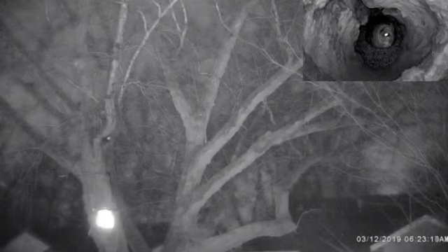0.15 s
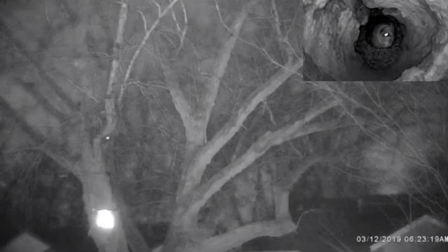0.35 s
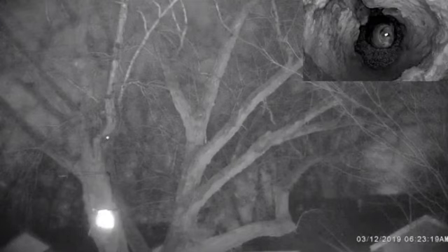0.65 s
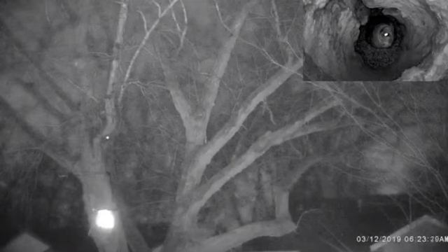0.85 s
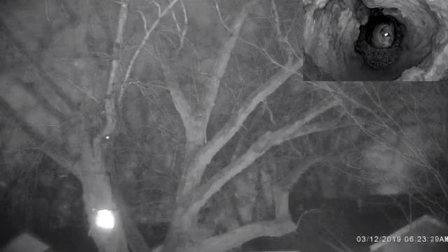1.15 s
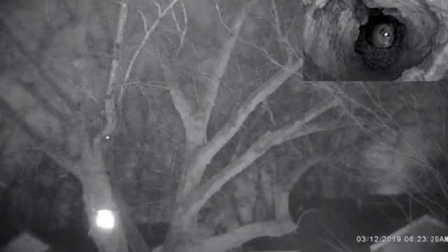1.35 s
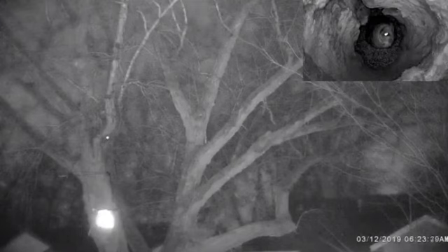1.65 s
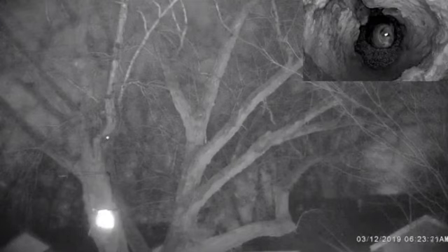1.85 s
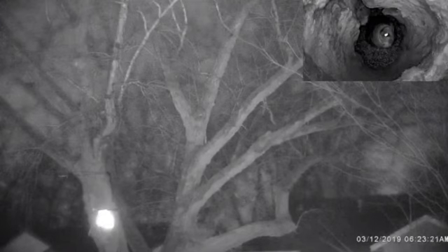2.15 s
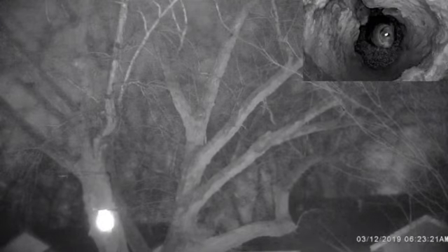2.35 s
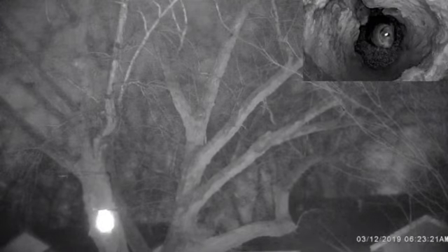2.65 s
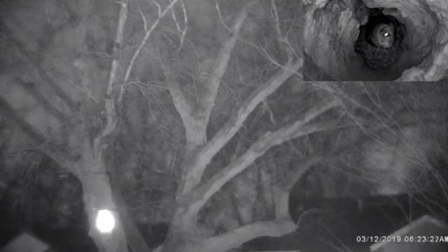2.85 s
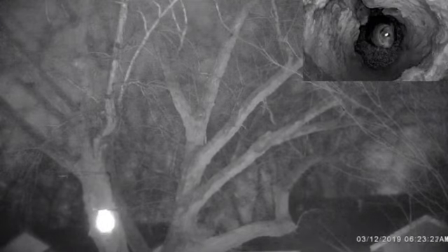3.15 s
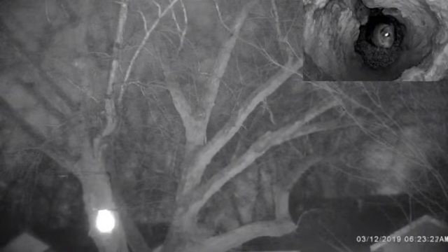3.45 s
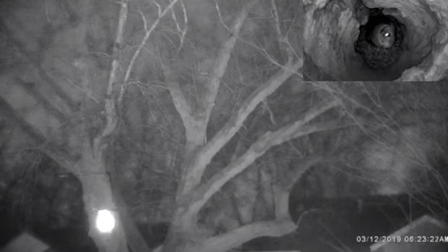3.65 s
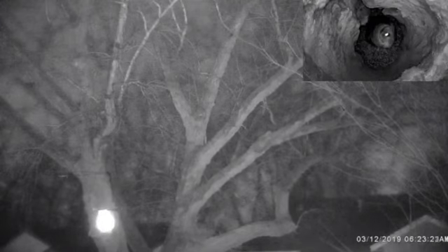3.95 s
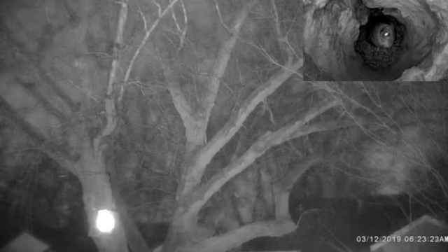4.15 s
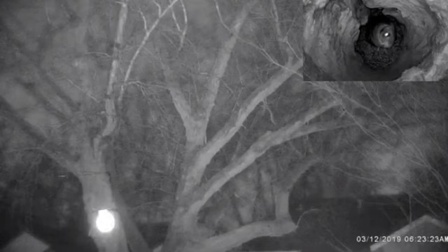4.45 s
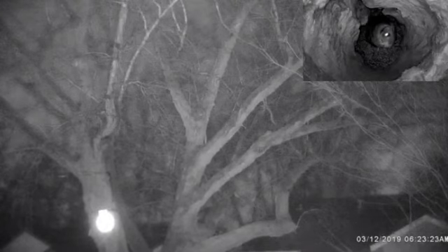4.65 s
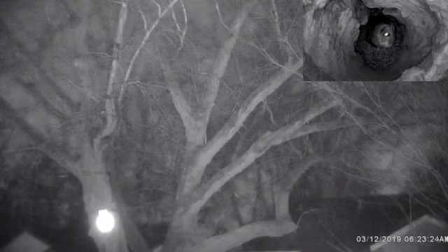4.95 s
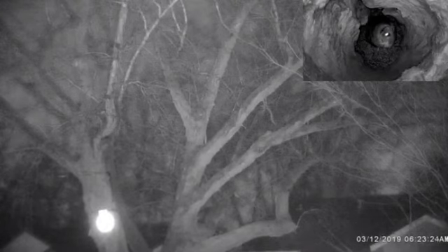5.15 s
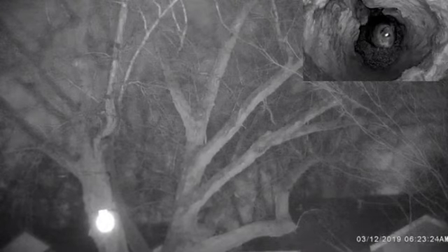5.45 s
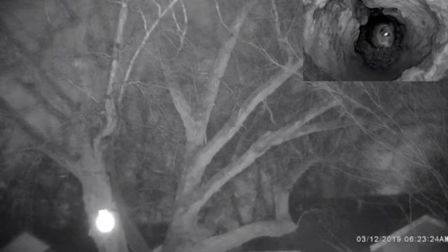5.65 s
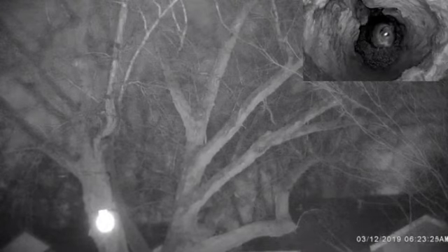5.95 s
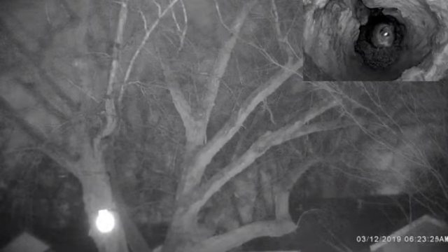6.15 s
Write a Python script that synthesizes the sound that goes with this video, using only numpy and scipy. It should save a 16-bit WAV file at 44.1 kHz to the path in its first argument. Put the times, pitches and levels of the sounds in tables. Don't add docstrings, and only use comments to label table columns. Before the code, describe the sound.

Wooden bumps and scratching, a thin wheezy squeal from a second bird, then a fast run of owl hoots ending in one long, shaky call.

```python
import sys
import numpy as np
from scipy import signal
from scipy.fft import rfft, irfft
from scipy.io import wavfile
from scipy.ndimage import uniform_filter1d

SR = 44100
rng = np.random.default_rng(int(sys.argv[2]) if len(sys.argv) > 2 else 0)


def elevation(decibels):
    levels = np.asarray(decibels, float)
    return 10 ** (levels / 20)


def persist_wave(psi):
    counts = np.round(np.clip(psi, -1, 1) * 32767).astype(np.int16)
    wavfile.write(sys.argv[1], SR, np.atleast_2d(counts).T)


N = 277830

CUTOFF_HZ = 7950
RASP_DB, BEAK_DB = -35.5, -7.5
# (start [s], length [s], top pitch [Hz], level [dB], lateness of the climb [exponent])
HOOTS = [(1.339, .07, 260.5, -28, 1.2), (1.67, .073, 206.1, -22, 0.86), (1.987, 0.081, 311, -20.5, 1.36),
         (2.293, 0.093, 287.1, -20, 1.21), (2.606, 0.1, 339.4, -22.5, 1.13), (2.914, 0.11, 413, -22, 1.2),
         (3.22, .11, 418.3, -20, 1.2), (3.528, 0.11, 417.7, -20, 1.07), (3.84, .113, 342.2, -20.5, .7),
         (4.154, 0.13, 400.4, -20, .85), (4.456, 0.12, 410, -19.5, 1.04), (4.771, 0.13, 421.8, -20, 1.02),
         (5.103, 0.14, 410, -22, 0.87)]


def at_hz(points, hz):
    points_hz, db = np.transpose(points)
    return np.interp(np.log(hz + 1), np.log(points_hz), db)


def in_time(rows, t):
    s, *columns = np.transpose(rows)
    return [np.interp(t, s, c) for c in columns]


def humps(rows, t):
    total = sum(elevation(db) * np.exp(-((t - s) / half) ** 2) for s, half, db in rows)
    return 20 * np.log10(total + 1e-7)


def rms_one(x):
    return x / np.sqrt(np.mean(x ** 2) + 1e-20)


def drift(rate, count):
    r = np.exp(-2 * np.pi * rate / SR)
    settle = 4000
    slow = signal.lfilter([1], [1, -2 * r, r * r], rng.standard_normal(count + settle))
    return rms_one(slow[settle:])


def coloured(spectrum):
    hz = np.arange(N // 2 + 1) * SR / N
    return rms_one(irfft(rfft(rng.standard_normal(N)) * elevation(at_hz(spectrum, hz)), N))


def band_pass(x, order, low_hz, high_hz):
    return signal.sosfilt(signal.butter(order, [low_hz, high_hz], "band", fs=SR, output="sos"), x)


def band(low_hz, high_hz):
    return rms_one(band_pass(rng.standard_normal(N), 3, low_hz, high_hz))


def resonance(hz, centre_hz, width_hz):
    return 1 / (1 - (hz / centre_hz) ** 2 + 1j * hz * width_hz / centre_hz ** 2)


def night(t):
    # (frequency [Hz], level [dB per Hz])
    floor_curve = [(15, -50), (25, -21), (32, -9), (44, -11), (65, -6), (124, -18.5), (186, -17.5),
                   (418, -35), (815, -30), (1350, -39.5), (1970, -43), (2750, -55.5), (7500, -78.5),
                   (9750, -91), (16500, -120)]
    # (frequency [Hz], rms level [dB])
    hum_lines = [(60, -68.5), (1935, -91.5)]
    hum = 0
    for hz, db in hum_lines:
        hum = hum + elevation(db + 0.85 * drift(5.3, N)) * np.sqrt(2) * np.sin(2 * np.pi * hz * t)
    return elevation(-60.5 + 0.4 * drift(15, N)) * coloured(floor_curve) + hum


def shuffle(t):
    # (time [s], half length [s], upper rumble [dB], deep rumble [dB])
    moves = [(.01, 0.051, -48.5, -45.5), (0.169, .02, -23.5, -35), (0.344, .025, -26.5, -30.5),
             (0.423, 0.054, -48.5, -37), (0.519, 0.028, -23, -29), (0.584, 0.035, -29, -33.5),
             (0.742, 0.023, -30, -49), (0.856, 0.048, -43.5, -34.5), (0.958, 0.045, -26, -36),
             (1.068, 0.064, -52.5, -46), (1.311, 0.026, -44, -53), (1.457, 0.028, -44.5, -58),
             (1.614, .06, -53.5, -57.5), (1.766, 0.046, -55, -40), (1.838, .012, -30.5, -36.5),
             (2.008, 0.042, -32.5, -34.5), (2.226, 0.026, -52, -50), (2.595, 0.031, -53.5, -60.5),
             (2.768, .03, -37, -35), (2.846, 0.023, -22, -41), (2.942, 0.074, -35.5, -35),
             (3.095, 0.09, -40.5, -37), (3.242, 0.036, -29, -35), (3.318, 0.06, -28, -39.5),
             (3.456, 0.028, -38.5, -46), (3.574, 0.033, -28.5, -37), (3.653, 0.036, -31.5, -45.5),
             (3.844, 0.018, -29, -31.5), (3.933, .025, -34.5, -34), (4.1, 0.097, -58, -56.5)]
    # (frequency [Hz], level [dB per Hz])
    edge_curve = [(82, -33.5), (140, 2.5), (345, -15.5), (652, -35.5), (742, -39.5), (835, -39.5),
                  (1500, -48), (1950, -90), (3300, -120)]
    deep_lag_s, deep_stretch = 0.023, 1.21
    still_s = 4.05
    restless = np.clip((still_s - t) / 0.071 + 1, 0, 1)

    deep_moves = [(s + deep_lag_s, half * deep_stretch, db) for s, half, _, db in moves]
    deep = elevation(humps(deep_moves, t)) + restless * elevation(-54.5 + 1.0 * drift(1.4, N))
    deep = deep * band(36, 70) * elevation(1.7 * drift(7.3, N))

    upper_db = np.maximum(humps([row[:3] for row in moves], t), -60.5 - 30 * (1 - restless))
    lumps = elevation(3.5 * drift(35, N))
    upper = elevation(upper_db - 3) * band(70, 140) * lumps
    edge = elevation(1.116 * (upper_db + 36.5) - 43.0) * coloured(edge_curve) * lumps

    rustle = elevation(-70.5) * band(1200, 6300) * np.exp(-((t - .535) / 0.081) ** 2)
    return deep + upper + edge + rustle


def bumps():
    # (time [s], peak level [dB], ring pitch [Hz])
    knocks = [(0.139, -15.5, 67.3), (0.169, -9, 61.9), (0.324, -27, 125), (0.343, -5.5, 139),
              (0.503, -15, 63), (0.523, -2, 93.6), (0.585, -5.5, 122), (0.722, -17, 163), (0.912, -7, 125),
              (0.97, -6.5, 67.3), (1.833, -10, 67.5), (1.959, -35, 64.6), (2.754, -11, 72.7),
              (2.802, -7, 64.6), (2.841, -8.5, 60.3), (3.045, -13.5, 96.9), (3.115, -14, 59.9),
              (3.378, -11, 70.6), (3.443, -23, 59.6), (3.818, -28, 76), (3.918, -11, 105)]
    out, t = np.zeros(N), np.arange(int(.06 * SR)) / SR
    for s, peak_db, hz in knocks:
        soft_start = 1 - np.exp(-(t / 0.0015) ** 2)
        push = np.sin(2 * np.pi * hz * t) * elevation(-60 * t * hz / 4.9) * soft_start
        at = int(s * SR)
        out[at:at + len(t)] -= elevation(peak_db - 6.5) * push
    return out


def ticks():
    # (time [s], peak level [dB], centre [Hz], ticks in the run [count])
    scratches = [(.137, -51, 4060, 1), (.161, -47, 4000, 1), (.173, -38.5, 3880, 1), (.34, -54.5, 2940, 2),
                 (0.351, -46, 1560, 1), (.463, -45, 3850, 1), (.501, -35.5, 2340, 5),
                 (0.509, -35.5, 3730, 4), (.582, -44, 4800, 3), (.885, -34.5, 3400, 1),
                 (0.884, -39, 2330, 1), (.975, -33, 3690, 1), (0.975, -36, 2314, 1), (1.03, -43.5, 1140, 1),
                 (1.837, -32, 378, 1), (1.948, -32.5, 2920, 1), (1.967, -38, 3260, 1),
                 (1.981, -37, 2600, 1), (2.019, -35, 3470, 1), (2.758, -30, 381, 1), (2.806, -40, 4140, 1),
                 (2.852, -26.5, 453, 1), (2.854, -44, 1200, 1), (2.856, -53.5, 3200, 1),
                 (3.266, -48, 5790, 2)]
    gap_s, loss_db = .009, 2.5
    out, t = np.zeros(N), np.arange(int(0.027 * SR)) / SR
    whites = rng.standard_normal((len(scratches), 5, len(t)))
    for (s, peak_db, hz, count), white in zip(scratches, whites):
        for k in range(round(count)):
            burst = white[k] * (t / .002) * np.exp(1 - t / 0.0017)
            burst = band_pass(burst, 3, hz * .82, min(hz * 1.11, 7800))
            at = int((s + k * gap_s - .002) * SR)
            level = elevation(peak_db - k * loss_db - 5.0)
            out[at:at + len(t)] += level * burst / np.abs(burst).max()
    return out


def wheezy_air():
    # (frequency [Hz], level [dB per Hz])
    air_curve = [(1500, -35.5), (2000, -20), (3000, -4.5), (4500, -9.5), (6500, -3), (7500, -4),
                 (7900, -14.5), (9000, -60)]
    # (centre [Hz], width [Hz], level [dB])
    peaks = [(2200, 350, -7), (3160, 62, 2.5), (3630, 52, 0.5), (5090, 28, -6), (5810, 27, -6.5),
             (6140, 160, -9.5), (6860, 83, 2.5), (7100, 32, -6.5)]
    hz = np.arange(N // 2 + 1) * SR / N
    whistles = .35 + sum(elevation(db) * np.abs(hz * w / c ** 2 * resonance(hz, c, w)) for c, w, db in peaks)
    air = rms_one(irfft(rfft(coloured(air_curve)) * whistles, N))
    return air + elevation(-6.5) * band(480, 860)


def squeal(t):
    # (time [s], pitch [Hz], level [dB])
    course = [
        (.66, 746, -79.5),
        (.7, 716, -59),
        (.78, 725.4, -55.5),
        (1.05, 727, -49.5),
        (1.215, 777, -51.5),
        (1.24, 854, -46),
        (1.31, 863, -44),
        (1.39, 780, -52),
        (1.44, 702, -46),
    ]
    # (multiple of the pitch, level [dB])
    partials = [(1, 1), (2, -12), (3, -19), (4, -20.5), (5, -15.5), (6, -24), (7, -23), (8, -22), (9, -19),
                (10, -3)]
    # (time [s], half length [s], level [dB])
    swells = [(.72, .05, -69), (1.03, .1, -56), (1.63, .05, -66), (1.88, .08, -61), (2.07, .04, -65),
              (2.2, .04, -69.5), (2.29, .03, -66.5), (2.47, .04, -64.5), (2.6, .04, -70), (2.95, .12, -71),
              (3.17, .05, -76)]
    start_s, jump_s, last_s = course[0][0], 1.224, course[-1][0]

    pitch, level_db = in_time(course, t)
    after = np.maximum(t - last_s, 0)
    trail_hz = 740 - 33 * after
    pitch = uniform_filter1d(np.where(after > .14, trail_hz, pitch), size=600)
    level_db = level_db - 11.5 * after + np.minimum(after * 6, 1) * (5.4 * drift(8.4, N) - 7)

    rise = np.clip((t - start_s) / 0.13, 0, 1)
    closed = np.clip((t - 1.26) / .05, 0, 1)
    wheeze_db = -51 - 14 * (1 - rise) ** 2 - 42 * closed ** 2

    broken = np.clip((t - jump_s) / 0.033, 0, 1)
    airless = np.clip(1 + (t - last_s) / 0.075, 0, 1)
    first_db = 3.0 - 26 * broken + (-33 + 21.5) * airless
    second_db = np.maximum(humps(swells, t) + 12.3 - level_db, -24 + 16 * (t < jump_s - .05))
    third_db = np.minimum(1.65 * first_db + 42, -.6 * first_db - 6.5)
    low_partials_db = {1: first_db, 2: second_db, 3: third_db, 4: 0}

    waver = .003 * drift(40, N) + (.004 + .005 * (after > 0)) * drift(300, N)
    turn = 2 * np.pi * np.cumsum(pitch * (1 + waver)) / SR
    thinning = np.clip(1 + (t - jump_s) / .07, 0, 1)
    tone = 0
    for k, db in partials:
        mouth_db = low_partials_db.get(k, wheeze_db + 52.5)
        mouth_db = mouth_db - 22 * (k in (5, 9, 10)) * thinning
        flicker_db = (3.0 + 0.18 * k) * drift(30, N)
        tone = tone + elevation(db + mouth_db + flicker_db) * np.sqrt(2) * np.sin(k * turn)

    gasp = elevation(-60.5) * band(2300, 3530) * np.exp(-((t - 1.33) / 0.063) ** 4)
    voice = elevation(level_db) * tone + gasp + elevation(wheeze_db - 4.5) * wheezy_air()
    return voice * (t > start_s) * (t < 3.3)


def rasp(since, turns, rasp_db, ring, second):
    puffs = rng.standard_normal(len(since)) * (0.16 + np.cos(np.pi * turns) ** 4)
    noise = band_pass(puffs, 1, 900, 1800)
    top_hz = 4800 + 75 * (rasp_db - RASP_DB)
    noise = signal.sosfilt(signal.cheby2(12, 50, top_hz, fs=SR, output="sos"), noise)
    on_rise = np.exp(-((since - .035) / 0.028) ** 2) * (.7 + 0.89 * second ** 2)
    return elevation(rasp_db + 4.5) * rms_one(noise) * (on_rise + 1.4 * ring ** 2)


def hoot(rows, rasp_db, beak_db, croak):
    # (centre [Hz], width [Hz])
    throat_rows = [(470, 623), (510, 203), (820, 515)]
    # (centre [Hz], width [Hz], level [dB])
    beak_rows = [(1134, 780, -33), (1390, 160, -47), (2600, 480, -44), (3180, 210, -50), (4580, 390, -58),
                 (5160, 53, -58), (7740, 1300, -49)]
    (first_s, first_hz, first_db), (last_s, _, last_db) = rows[0], rows[-1]
    start, end = first_s - .007, last_s + .015
    t = start + np.arange(int((end - start) * SR)) / SR
    onset = [(start, first_hz, -85), (start + 0.0026, first_hz, first_db - 4)]
    release = [(last_s + 0.0063, 100, last_db - 6), (t[-1], 100, -75)]
    pitch, level_db = in_time(onset + list(rows) + release, t)

    wobble = np.sin(2 * np.pi * 17.6 * np.maximum(t - 5.525, 0))
    pitch = uniform_filter1d(pitch * (1 + 0.12 * wobble), size=400, mode="nearest")

    ring, second = np.exp(-((pitch * [[1], [2]] - 486) / 60) ** 2)
    rising = np.where(np.gradient(pitch) > 0, 1, .6)
    level_db = level_db + 6.5 * ring + 5 * second * rising + wobble
    slack = np.clip((260 - pitch) / 110, 0, 1)
    pitch = pitch * (1 + (0.0032 + .025 * slack + croak) * drift(54, len(t)))

    order = np.arange(1, 25)[:, None]
    hz = order * pitch
    turns = np.cumsum(pitch) / SR - .42
    throat = np.prod([resonance(hz, c, w) for c, w in throat_rows], axis=0)
    throat = throat * (hz / 165) ** 2 * resonance(hz, 150, 150)

    beak = 0
    for c, w, db in beak_rows:
        gain = elevation(db + (beak_db if c > 2000 else BEAK_DB))
        beak = beak + gain * (hz * w / c ** 2 * resonance(hz, c, w)) ** 4
    beak = beak * np.where(hz > 2900, np.clip((pitch - 200) / 110, .05, 1), 1)
    quiet_db = 1.5 * np.minimum(level_db - level_db.max() + 9, 0)
    beak = beak * 3 * elevation(1.5 * drift(30, len(t)) + quiet_db)
    beak = beak * np.clip((t - start) / .04, 0, 1) ** 2 * (hz < CUTOFF_HZ)

    tone = -np.real(((throat + beak) * np.exp(2j * np.pi * order * turns)).sum(axis=0))
    tone = tone / np.sqrt((np.abs(throat) ** 2).sum(axis=0) / 2)
    tone = tone * elevation(1.4 * slack * drift(78, len(t)))
    breath = rms_one(band_pass(rng.standard_normal(len(t)), 2, 220, 900))
    voice = tone + elevation(-53 + 10 * slack) * breath + rasp(t - start, turns, rasp_db, ring, second)
    return int(start * SR), voice * elevation(uniform_filter1d(level_db, size=100, mode="nearest"))


def quick_hoot(s, length, top_hz, db, late):
    # (share of length, share of the climb from slack to top pitch, level [dB])
    shape = [
        (0.0, 0.017, -5.5),
        (.14, .34, 0),
        (.29, .7, 2.03),
        (.43, .9, 1.1),
        (.57, 1, -1.15),
        (.7, .88, -9.5),
        (.82, .45, -11),
        (.9, .22, -12),
        (1, 0.0064, -17.5),
    ]
    start_hz, slack_hz, full_hz = 149.9, 110.2, 410
    share, climb, shape_db = np.transpose(shape)
    climb = climb ** np.where(share < .6, late, (top_hz - slack_hz) / (full_hz - slack_hz))
    rest_hz = start_hz + (slack_hz - start_hz) * share
    pitch = rest_hz + climb * (top_hz - rest_hz)
    level_db = db + shape_db * (top_hz / full_hz) ** 1.1
    rows = np.transpose([s + length * share, pitch, level_db])

    harsh_db = min(2.2 * (db + 20.5), 2.5)
    croak = .09 * (s < HOOTS[1][0])
    return [tuple(row) for row in rows], RASP_DB + harsh_db, BEAK_DB + 0.25 * harsh_db, croak


def owl():
    # (time [s], pitch [Hz], level [dB])
    long_note = [
        (5.262, 165.4, -26),
        (5.297, 313.8, -23),
        (5.333, 591, -25),
        (5.39, 623.7, -25),
        (5.455, 611.6, -21),
        (5.495, 534.6, -22.5),
        (5.512, 302.7, -23.5),
        (5.58, 228.2, -26.5),
        (5.789, 137.9, -27),
    ]
    out = np.zeros(N)
    voices = [quick_hoot(*row) for row in HOOTS]
    voices.append((long_note, RASP_DB - 9, -0.5, 0))
    for voice in voices:
        at, call = hoot(*voice)
        out[at:at + len(call)] += call

    leaks = [(row[0] - .016, .016, row[3] - 42) for row in HOOTS]
    out += band(350, 1150) * elevation(humps(leaks, np.arange(N) / SR))
    out = signal.sosfiltfilt(signal.butter(2, 135, "high", fs=SR, output="sos"), out + 1e-18)

    t = np.arange(int(.25 * SR)) / SR
    echo = rng.standard_normal(len(t)) * elevation(-60 * t / 0.07) * (t > .004)
    echo = echo / np.sqrt(np.sum(echo ** 2))
    return out + elevation(-27.5) * signal.fftconvolve(out, echo)[:N]


def scene():
    t = np.arange(N) / SR
    return (night(t) + shuffle(t) + bumps() + ticks() + squeal(t) + owl())[None, :]


def roll_off(x):
    return signal.sosfilt(signal.butter(12, 7990, fs=SR, output="sos"), x)


def record(dry):
    rounded = dry / (1 + (np.abs(dry) / .29) ** 4) ** .25
    narrow = signal.sosfilt(signal.cheby2(12, 60, CUTOFF_HZ, fs=SR, output="sos"), rounded)
    wavering_grain = elevation(-99) * rng.standard_normal(dry.shape) * elevation(2.5 * drift(5, N))
    steady_grain = elevation(-90.5) * rng.standard_normal(dry.shape)
    return roll_off(narrow + wavering_grain + steady_grain)


dry = scene()
out = record(dry)
persist_wave(out)
```